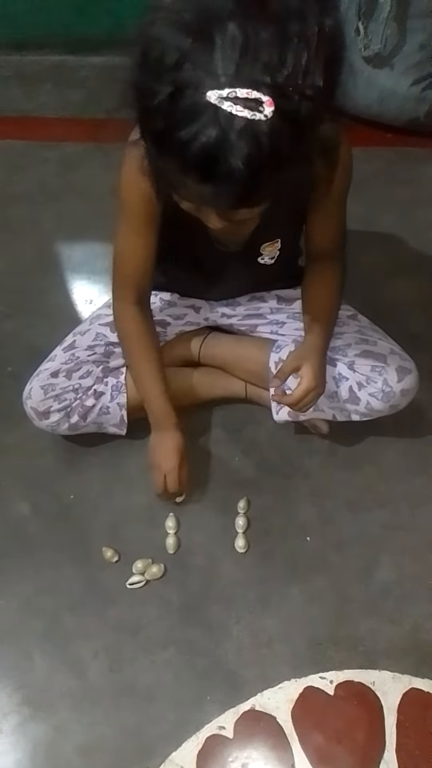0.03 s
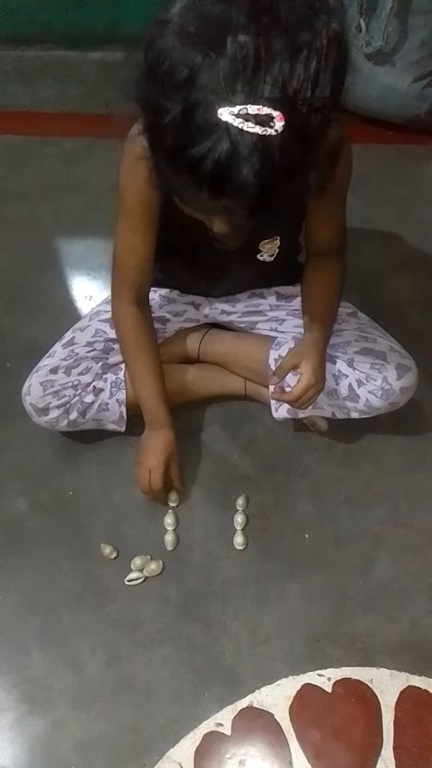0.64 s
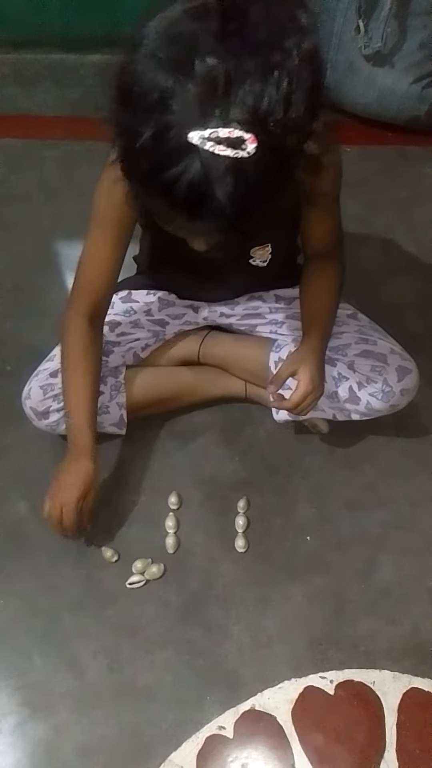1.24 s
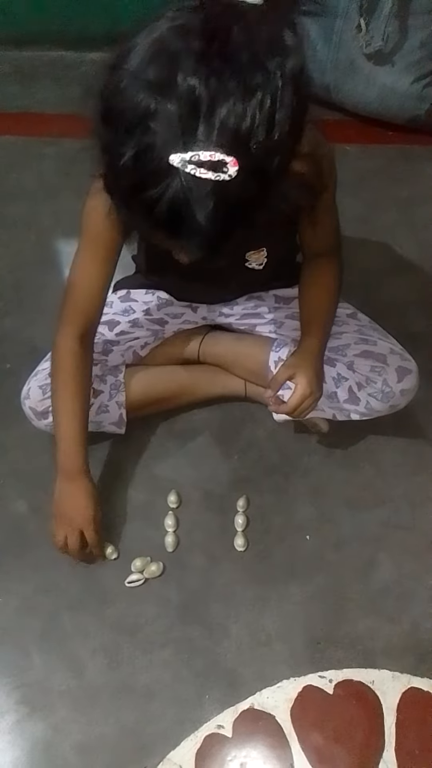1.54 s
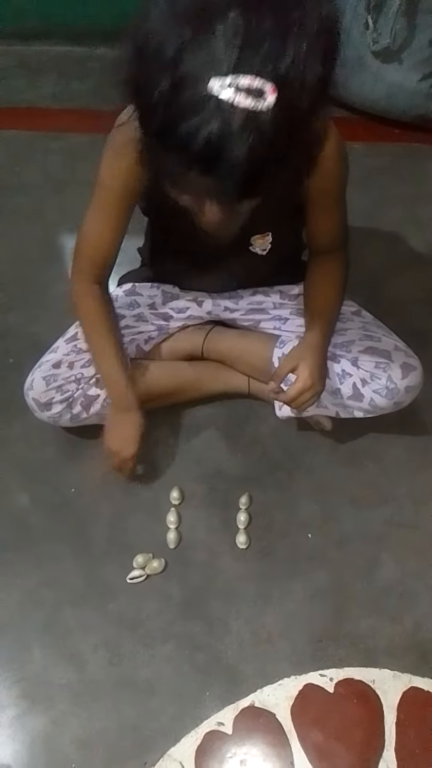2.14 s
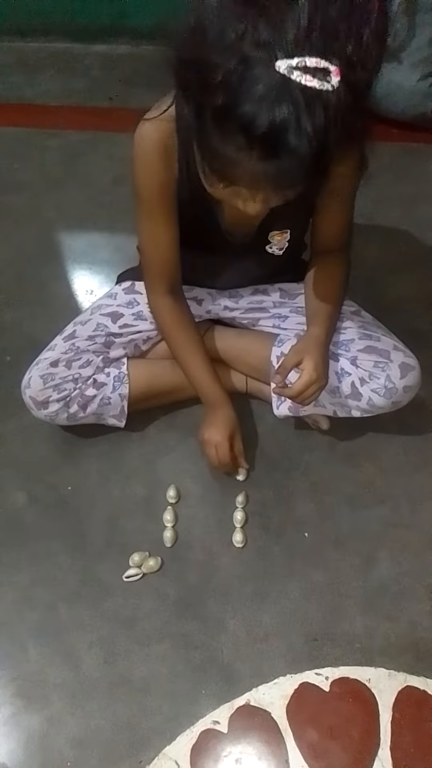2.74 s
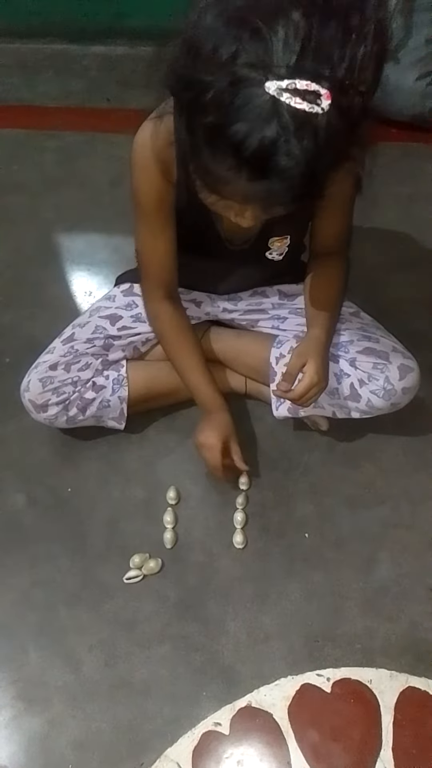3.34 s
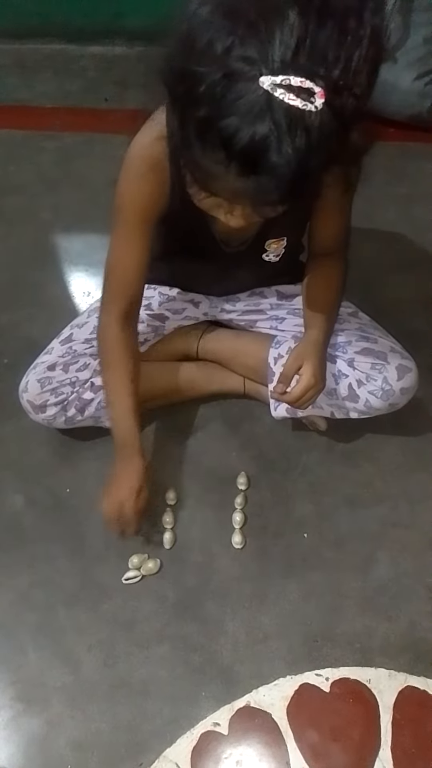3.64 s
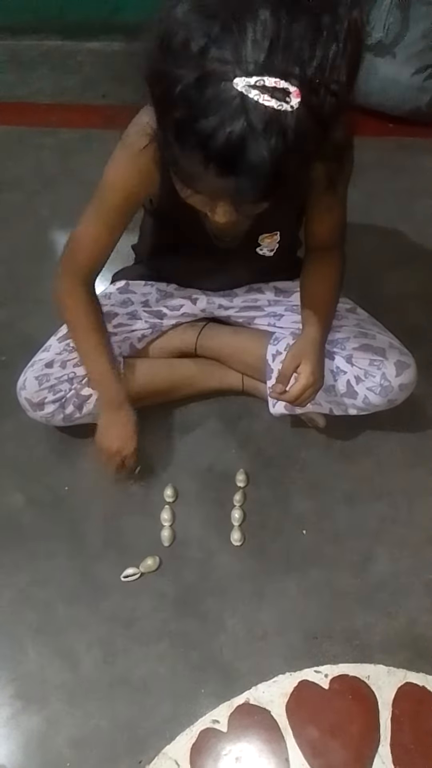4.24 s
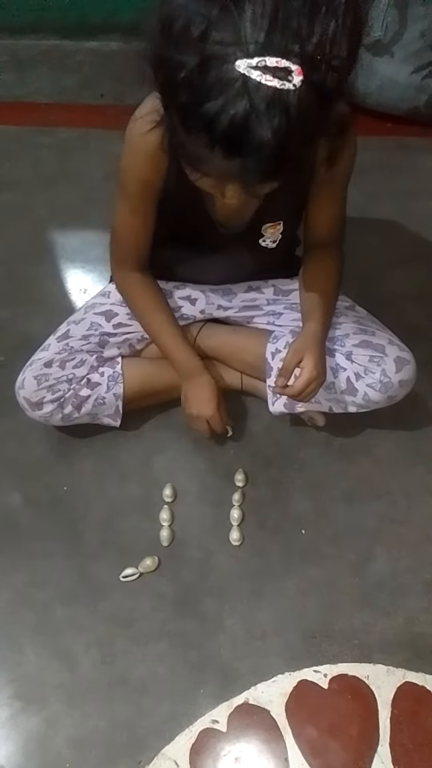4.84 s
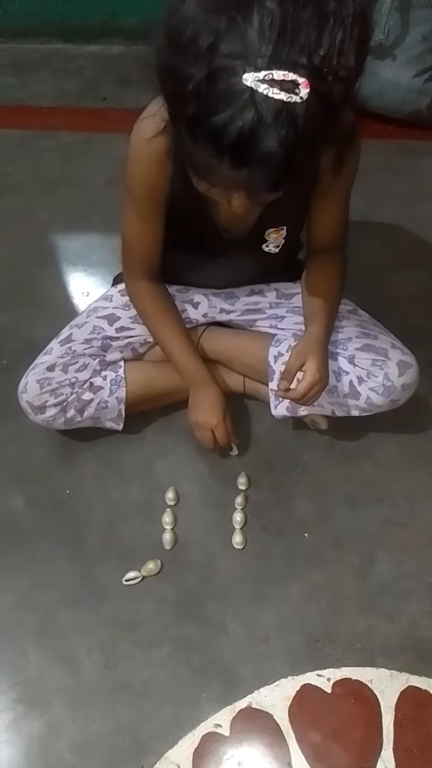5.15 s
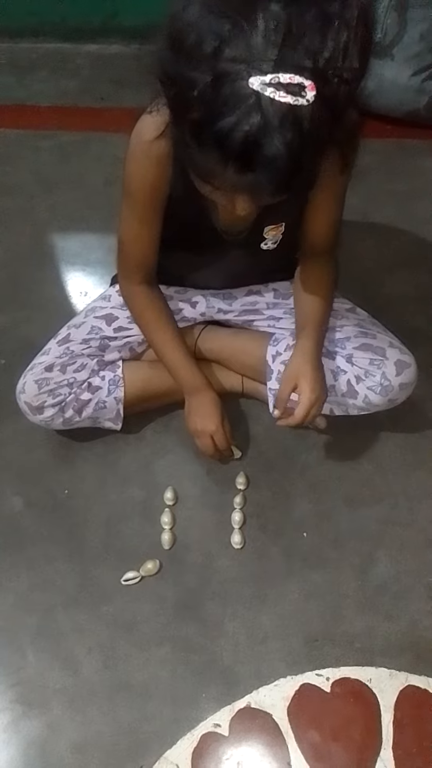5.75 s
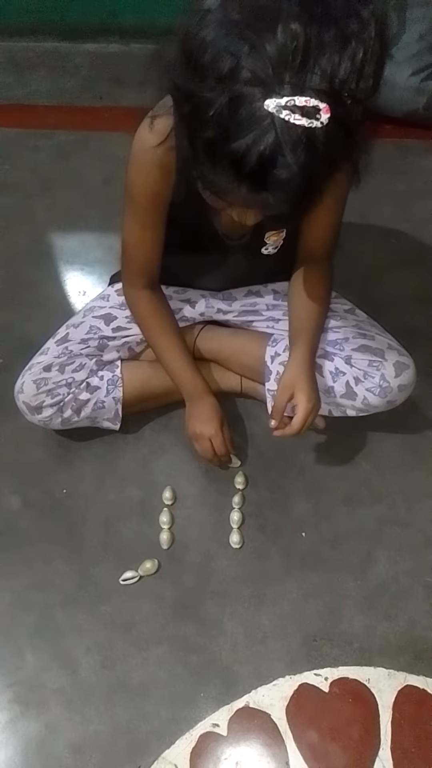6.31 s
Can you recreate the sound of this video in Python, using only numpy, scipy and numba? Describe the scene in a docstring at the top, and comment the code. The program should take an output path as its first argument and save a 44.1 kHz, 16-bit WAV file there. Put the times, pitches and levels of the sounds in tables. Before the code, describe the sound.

In a small bare room a fan hums quietly while a far-off drone swells and fades. About a metre from the microphone, little hollow shells tick and scrape over a hard floor in two short spells with a pause between, followed by a few lighter taps as one is lined up. Soft, low thuds of a hand and shifting body come in between.

```python
"""Cowrie shells on a concrete floor

Shells are picked up, slid over polished concrete and set in a row, a metre away. The floor's grain
taps each shell thousands of times a second and excites its two resonances; knocks set the same two
ringing. Fingers and limbs bump softly. A fan hums in the small hard room, and a distant drone
swells and fades."""
import sys
import numpy as np
from scipy import signal
from scipy.fft import rfft, irfft
from scipy.io import wavfile
from numba import njit

SR = 44100
rng = np.random.default_rng(int(sys.argv[2]) if len(sys.argv) > 2 else 0)


def wav_out(sig):
    """Save sig, one row per channel (or a flat mono array), as 16-bit PCM at SR to the path in sys.argv[1]."""
    wavfile.write(sys.argv[1], SR, np.round(np.clip(np.atleast_2d(sig).T, -1, 1) * 32767).astype(np.int16))


N = 290178
TIME = np.arange(N) / SR
FREQS = np.maximum(np.fft.rfftfreq(N, 1 / SR), 1)


def slides(low_db=-2, high_db=-1.0, grit_db=-0.5, patchy_db=1.7, uneven_db=1.5):
    """Roughness excitation: one train of impacts drives the shell's two modes and a gritty hiss."""
    # spectrum of the grit under the shell: f/Hz, relative level/dB
    grit_spectrum = [(1000, -39.5), (2200, -5.5), (2800, -6), (3500, 9.5), (4700, 7), (6000, -3), (6700, 0),
                     (8200, 2), (9500, -21.5), (11500, -18.5), (15500, -21)]
    # two long slides, one curve each: t/s, relative level/dB of low mode, high mode and grit
    strokes = [
        [(1.94, -74, -88, -80), (1.968, -84, -80, -82), (2.03, -70.5, -88, -75), (2.198, -70.5, -74, -71),
         (2.208, -53, -69, -63), (2.23, -71.5, -64, -74), (2.41, -64, -54, -71.5), (2.492, -53, -58, -70.5),
         (2.536, -47.5, -66, -78), (2.73, -83, -92.5, -90), (2.75, -86, -90, -91)],
        [(3.97, -77, -95, -90), (4.07, -59.5, -78, -73), (4.116, -72.5, -86.5, -75), (4.31, -49.5, -64.5, -70),
         (4.336, -60, -67, -78), (4.392, -48.5, -73, -67), (4.512, -63, -63.5, -73.5),
         (4.538, -57.5, -68.5, -72), (4.672, -50, -58.5, -72.5), (4.68, -56, -68, -81), (4.82, -82, -90, -94)],
    ]
    # nudges that line a shell up: middle t/s, half length/s, the same three levels/dB
    nudges = [(0.051, 0.063, -64.5, -69, -80), (4.987, 0.023, -74, -92, -88), (5.2, 0.13, -75, -101, -92)]
    taps = asperities(rate=3200, spread_db=2.5, chatter_db=2.45, chatter_rate=260)
    low, high = (unit(shell_ring(taps / np.sqrt(width), hz, width)) for hz, width in grip())
    # the point of contact keeps changing, so bands of the hiss come and go on their own
    edges_hz = np.geomspace(2000, 16000, 11)
    spectrum = rfft(colour(taps, grit_spectrum))
    bands = (irfft(spectrum * ((FREQS >= lo) & (FREQS < hi)), N)
             for lo, hi in zip(edges_hz, edges_hz[1:]))
    grit = sum(band * undb(patchy_db * walk(25)) for band in bands)
    voices = undb(low_db) * low, undb(high_db) * high, undb(grit_db) * unit(grit)
    gains = np.zeros((3, N))
    for stroke in strokes:
        times, *levels = np.transpose(stroke)
        moving = (TIME >= times[0]) & (TIME <= times[-1])
        gains += [undb(np.interp(TIME, times, db)) * moving for db in levels]
    for middle, half_length, *levels in nudges:
        gains += [swell(middle, half_length, db) for db in levels]
    return sum(voice * gain * undb(uneven_db * walk(35)) for voice, gain in zip(voices, gains))


def knocks(crack_s=0.0063, crack_db=-7, ring_db=-1):
    """Impulse response: a short crack of contact, then the hollow shell's modes decay freely."""
    # blows on the floor or a neighbour: t/s, relative level/dB of low mode, high mode and crack
    impacts = [(0.059, -49, -51, -65), (.338, -62, -56, -69), (1.875, -36.5, -46.5, -50.5),
               (1.909, -49, -75, -79), (2.16, -73, -41, -68), (2.203, -43, -58, -67),
               (2.319, -58.5, -48, -51.5), (2.365, -58, -58, -57), (2.423, -41, -50, -48.5),
               (2.45, -33, -36.5, -64), (2.521, -34, -67, -71), (2.559, -36.5, -56, -70),
               (2.628, -49.5, -66.5, -71), (2.884, -54, -68, -64), (3.622, -74, -66, -74),
               (4.029, -55, -68, -58), (4.077, -53, -79, -52), (4.227, -56, -50, -55),
               (4.269, -49, -66, -58), (4.311, -50, -55.5, -55), (4.368, -41, -63, -71),
               (4.411, -26, -62, -67), (4.446, -33, -56, -53.5), (4.637, -29, -55, -50.5),
               (4.666, -45, -41, -54), (4.84, -68, -55, -58.5), (5.097, -44, -76, -72),
               (5.156, -52, -72, -74), (5.215, -54, -78, -78), (5.446, -44, -51.5, -66)]
    # f/Hz, relative level/dB
    crack_spectrum = [(1500, -28), (2500, 3.0), (3200, 17.5), (7800, -12), (9500, -10.5), (15500, -17.5)]
    low, high, envelope = np.zeros((3, N))
    for start, low_db, high_db, contact_db in impacts:
        add(low, start, undb([low_db]))
        add(high, start, undb([high_db]))
        add(envelope, start, undb(contact_db) * np.exp(-TIME[:SR // 10] / crack_s))
    # a narrow mode spreads the blow over a longer time, so it takes a stronger one for the same peak
    rings = sum(shell_ring(blows * SR / (2 * width), hz, width)
                for blows, (hz, width) in zip((low, high), grip()))
    grit = colour(rng.standard_normal(N), crack_spectrum)
    return undb(ring_db) * rings + undb(crack_db) * envelope * grit


def rasp():
    """Friction noise: pressed hardest, the rim catches finely and excites a bright resonance."""
    catches = asperities(rate=2500, spread_db=0, chatter_db=1.0, chatter_rate=200)
    return swell(middle=2.42, half_length=0.047, db=-70.5) * resonate(catches, hz=5730, width=740)


def asperities(rate, spread_db, chatter_db, chatter_rate):
    """Stick-slip: about `rate` random impacts a second, stronger and weaker as the shell catches."""
    taps = np.zeros(N)
    hit = rng.random(N) < rate / SR
    push, size = rng.standard_normal((2, N))[:, hit]
    taps[hit] = push * undb(spread_db * size + chatter_db * walk(chatter_rate)[hit])
    return taps


def shell_ring(taps, hz, width):
    """Resonators in cascade: three closely tuned ones give a shell mode its steep-sided peak."""
    ring = bandpass(taps, hz, width)
    for side in (-1, 1):
        ring = bandpass(ring, hz + side * width * np.sqrt(3) / 4, width / 2)
    return ring


def grip(free_hz=3005, free_width_hz=155, pinched_width_hz=620, pinch_s=0.12):
    """Contact damping: a pinch shifts and widens the low mode; the high one changes with each hold."""
    # holds: taken t/s, let go t/s, easing time/s, pinched low mode f/Hz, high mode f/Hz, its width/Hz
    holds = [(-.1, 0.246, 0.3, 3240, 7280, 252), (1.93, 2.546, 0.096, 2976, 7270, 673),
             (3.9, 4.583, .45, 3180, 7310, 294), (4.84, 5.8, 0.71, 3150, 7300, 485)]
    low_hz, low_width, high_hz, high_width = np.outer(
        [free_hz, free_width_hz, *holds[0][-2:]], np.ones(N))
    for taken, let_go, ease, pinched_hz, hz, width in holds:
        pinch = np.clip(np.minimum((TIME - taken) / pinch_s, (let_go - TIME) / ease), 0, 1)
        low_hz += pinch * (pinched_hz - free_hz)
        low_width += pinch * (pinched_width_hz - free_width_hz)
        high_hz[TIME > taken], high_width[TIME > taken] = hz, width
    return (low_hz, low_width), (high_hz, high_width)


def bumps(rumble_db=3):
    """Soft impact: yielding flesh gives brief low-frequency pulses; a rumble follows the movement."""
    # bumps of hand and limbs: t/s, envelope peak level/dB, f/Hz, Gaussian half length/s
    pulses = [(.16, -26.5, 90, 0.0031), (.255, -35, 70, 0.021), (.819, -21, 129, 0.0015),
              (1.318, -29, 105, 0.0063), (1.338, -25, 161, 0.0016), (1.648, -31, 155, 0.007),
              (1.71, -27.5, 69.6, 0.0023), (2.599, -15.5, 146, 0.0025), (2.655, -36, 142, 0.0095),
              (2.76, -25.5, 109, 0.0042), (5.811, -30.5, 70.5, 0.009), (5.843, -24, 52, 0.0079),
              (6.384, -35, 60, 0.015)]
    # shifts of the body: middle t/s, half length/s, relative level/dB
    shifts = [(.02, 0.06, -41.5), (.84, 0.063, -43), (1.34, 0.066, -37), (1.72, 0.15, -36.5),
              (2.2, 0.18, -49.5), (2.62, 0.092, -39), (3.8, 0.084, -51.5), (5.83, .03, -34.5)]
    # spectrum of their rumble: f/Hz, relative level/dB
    rumble_spectrum = [(15, -21.5), (30, 1), (55, 3), (120, 4.5), (165, 1.5), (230, -10.5), (330, -6.5),
                       (600, -43.5), (2000, -92.5)]
    thuds = np.zeros(N)
    t = np.arange(-SR // 20, SR // 20) / SR
    for middle, db, hz, half_length in pulses:
        envelope = undb(db) * np.exp(-.5 * (t / half_length) ** 2)
        add(thuds, middle + t[0], envelope * np.cos(2 * np.pi * (hz * t + rng.random())))
    rumble = colour(rng.standard_normal(N), rumble_spectrum)
    return thuds + undb(rumble_db) * swells(shifts, rest_db=-64) * rumble


def fan(air_db=-45, flutter_db=0.75, waver_db=1.85):
    """Forced vibration: the motor hums at twice the mains frequency; moving air excites room modes."""
    # partials of the motor hum: f/Hz, rms level/dB
    partials = [(99.74, -41), (299.2, -60.5)]
    # spectrum of the air noise: f/Hz, relative level/dB
    air_spectrum = [(20, -0.5), (60, 0), (150, -1.5), (270, 1.5), (410, -4), (490, -23), (620, -16.5),
                    (790, -24), (1400, -20), (1600, -25), (2200, -30.5), (3000, -39), (6200, -49.5),
                    (7700, -48.5), (9700, -65.5), (15500, -67.5)]
    # room modes, each swelling and sinking on its own: f/Hz, width/Hz, level/dB
    room_modes = [(246.7, 14, -54.5), (281, 20, -55), (370, 12, -58.5), (930, 140, -66), (1186, 130, -71.5),
                  (1309, 200, -67.5)]
    hum = sum(np.sqrt(2) * undb(db) * np.sin(2 * np.pi * (hz * TIME + rng.random()))
              for hz, db in partials)
    air = undb(air_db + flutter_db * walk(20)) * colour(rng.standard_normal(N), air_spectrum)
    modes = sum(undb(db + 1.6 * walk(9.3)) * resonate(rng.standard_normal(N), hz, width)
                for hz, width, db in room_modes)
    return hum * undb(waver_db * walk(6.8)) + air + modes


def drone(width_hz=280.0, flicker_db=1.5, rush_flicker_db=2):
    """Narrow-band noise: a dull far-off drone wanders in pitch, with a fitful hollow rush above it."""
    # course of the drone: t/s, level/dB, centre f/Hz
    course = [(0.0, -48.5, 540), (0.38, -63.5, 622), (0.6, -59.5, 548), (1.54, -49.5, 585),
              (2.67, -47.5, 576), (2.84, -59, 586), (3.11, -57, 600), (3.22, -65, 660), (4.16, -57.5, 567),
              (4.29, -50.5, 598), (4.65, -61.5, 574), (4.84, -51.5, 657), (5.3, -46.5, 584),
              (5.66, -51, 653), (5.81, -58.5, 570), (5.83, -47.5, 568), (6.41, -54.5, 564),
              (6.58, -49.5, 573)]
    # its spectrum ahead of the moving band: f/Hz, relative level/dB
    drone_spectrum = [(150, -46), (400, 5.5), (470, 0.5), (512, 2), (535, -5.5), (558, 7.5), (590, -1.5),
                      (680, 1.5), (740, -8.5), (850, -14.5), (1150, -26), (3000, -94)]
    # swells of the rush: middle t/s, half length/s, level/dB
    rush_swells = [(1.4, 0.024, -56), (2.7, 0.16, -57.5), (4.93, 0.089, -55.5), (5.25, 0.12, -62),
                   (6.15, 0.18, -61)]
    times, db, hz = np.transpose(course)
    noise = colour(rng.standard_normal(N), drone_spectrum)
    body = unit(bandpass(noise, np.interp(TIME, times, hz), np.full(N, width_hz)))
    rush = resonate(rng.standard_normal(N), hz=935, width=110) * undb(rush_flicker_db * walk(16))
    body_gain = undb(np.interp(TIME, times, db) + flicker_db * walk(14))
    return body_gain * body + swells(rush_swells, rest_db=-72.5) * rush


def room(x, t60_s=0.26, build_s=0.0018, tail_db=-2.5):
    """Reverberation: bare walls add a short diffuse tail that decays exponentially."""
    t = TIME[:SR // 2]
    envelope = np.exp(-np.log(1000) * t / t60_s) * (1 - np.exp(-t / build_s))
    tail = rng.standard_normal(len(t)) * envelope
    return x + undb(tail_db) * signal.fftconvolve(x, tail / np.linalg.norm(tail))[:N]


@njit
def bandpass(x, hz, width):
    """Second-order resonator (state-variable) of moving centre and width; gain 1 at the centre."""
    y, band_state, low_state = np.zeros(len(x)), 0., 0.
    for i in range(len(x)):
        if abs(x[i]) + abs(band_state) + abs(low_state) > 1e-14:  # at rest there is nothing to ring
            tuning, damping = np.tan(np.pi * hz[i] / SR), width[i] / hz[i]
            band = (band_state + tuning * (x[i] - low_state)) / (1 + tuning * (tuning + damping))
            band_state = 2 * band - band_state
            low_state += 2 * tuning * band
            y[i] = damping * band
    return y


def resonate(x, hz, width):
    """Zero-phase resonance, its magnitude squared for steep skirts; rms 1."""
    detuning = hz / width * (FREQS / hz - hz / FREQS)
    return unit(irfft(rfft(x) / (1 + detuning ** 2), N))


def colour(x, points):
    """Spectral shaping by a curve of (f/Hz, level/dB) points; rms 1."""
    hz, db = np.transpose(points)
    response = undb(np.interp(np.log(FREQS), np.log(hz), db))
    return unit(irfft(rfft(x) * response, N))


def walk(rate):
    """Random modulation: straight lines through `rate` random values a second; rms 1."""
    knots = rng.standard_normal(4096)
    return unit(np.interp(TIME * rate, np.arange(len(knots)), knots))


def swell(middle, half_length, db):
    """Gaussian envelope: a bell-shaped rise and fall of gain, with times in seconds."""
    return undb(db) * np.exp(-.5 * ((TIME - middle) / half_length) ** 2)


def swells(rows, rest_db):
    """Incoherent addition: the gain of swells and a resting level whose powers add."""
    return np.sqrt(undb(rest_db) ** 2 + sum(swell(*row) ** 2 for row in rows))


def add(out, start, sound):
    """Superpose a short sound at `start` seconds."""
    i = max(int(start * SR), 0)
    out[i:i + len(sound)] += sound[:N - i]


def undb(db):
    """Decibels to amplitude ratio."""
    return np.exp(np.asarray(db) * np.log(10) / 20)


def unit(x):
    """Normalise to rms 1."""
    return x / np.sqrt(np.mean(x ** 2))


def scene():
    """Superposition: the reverberant shells over bumps, fan and drone, in one channel."""
    shells = room(slides() + rasp() + knocks())
    return (shells + bumps() + fan() + drone())[None]


def record(dry, top_hz=15700, offset=0.0076):
    """Band limiting: a steep low-pass cuts the top, and the converter rests slightly off zero."""
    lowpass = signal.ellip(8, .2, 70, top_hz, fs=SR, output="sos")
    return signal.sosfilt(lowpass, dry) + offset


dry = scene()
out = record(dry)
wav_out(out)
```